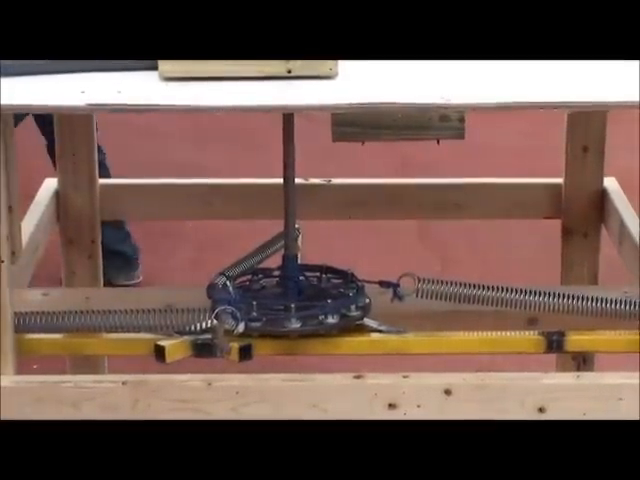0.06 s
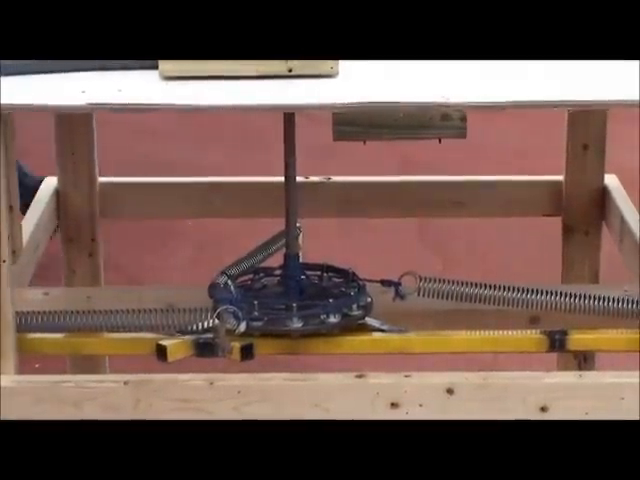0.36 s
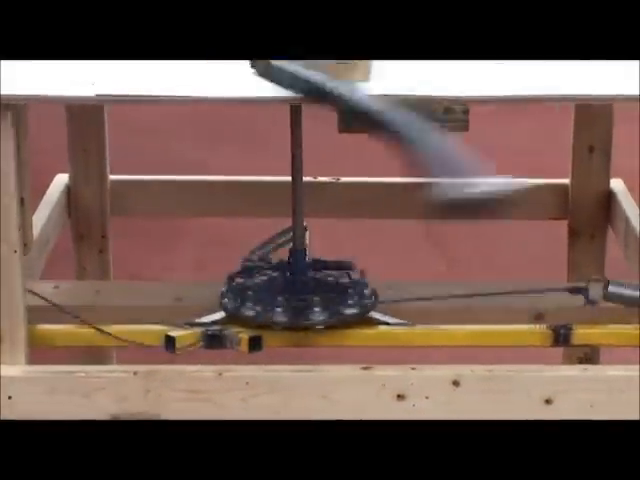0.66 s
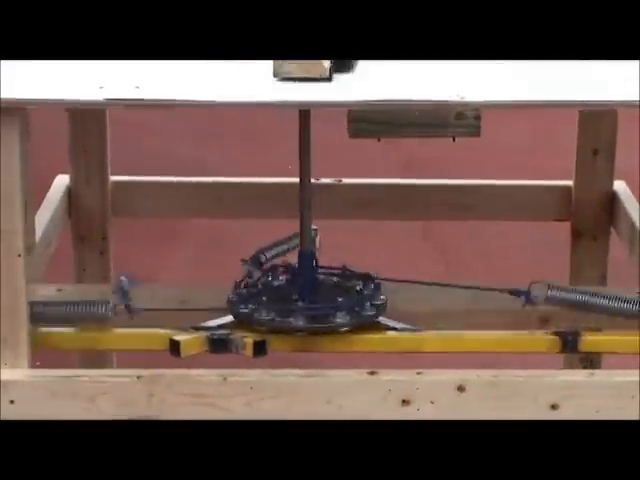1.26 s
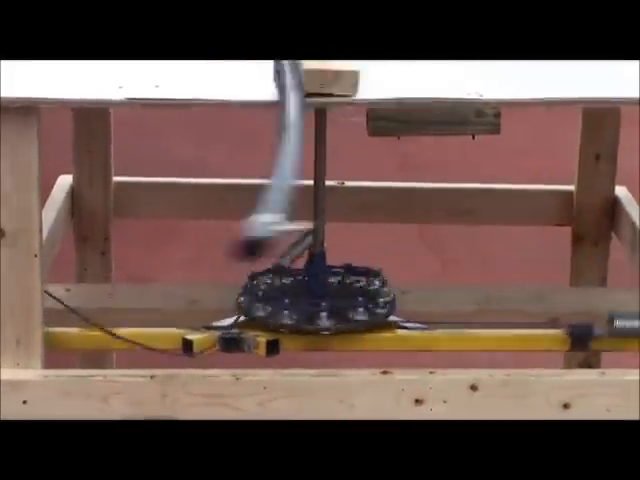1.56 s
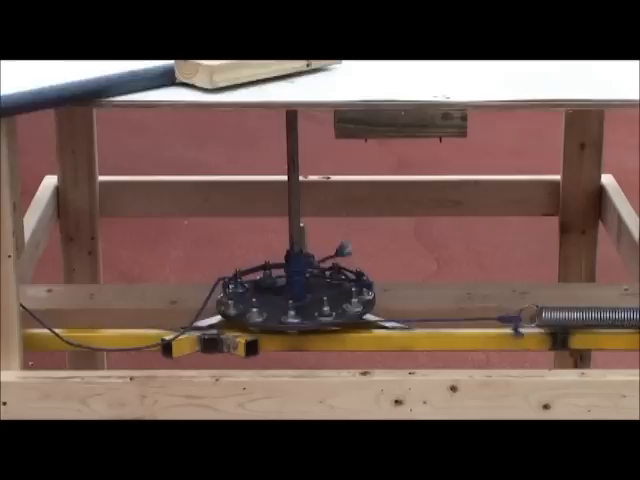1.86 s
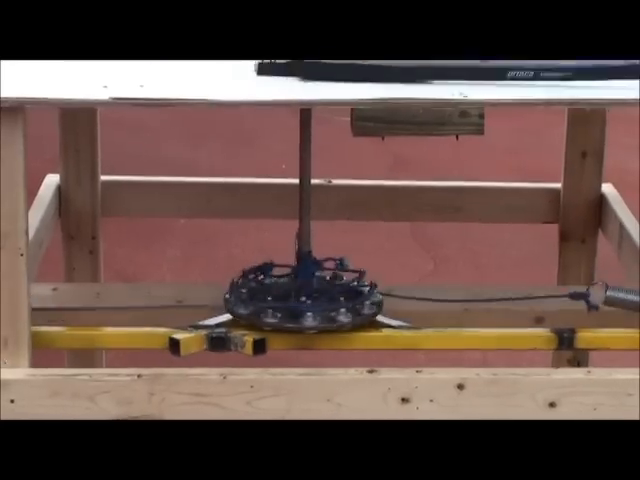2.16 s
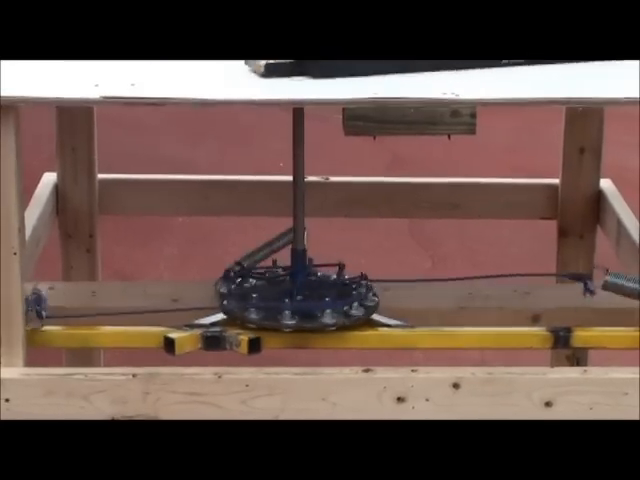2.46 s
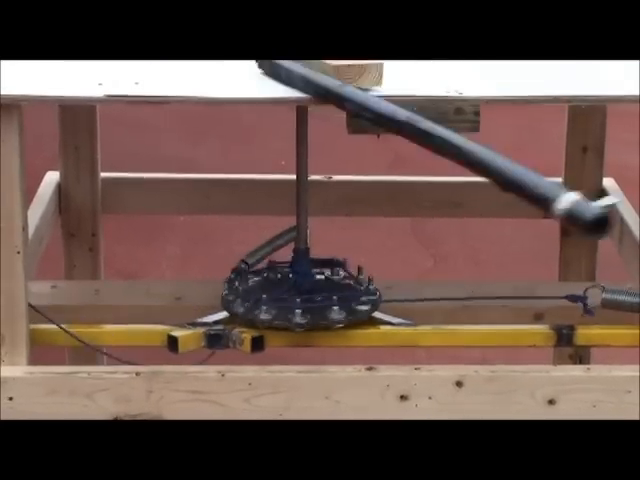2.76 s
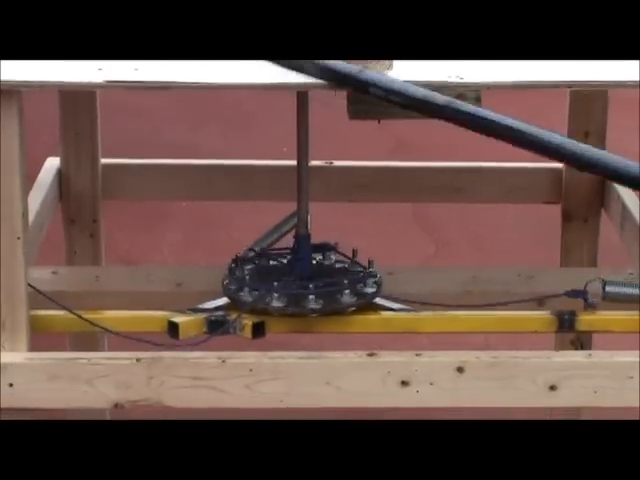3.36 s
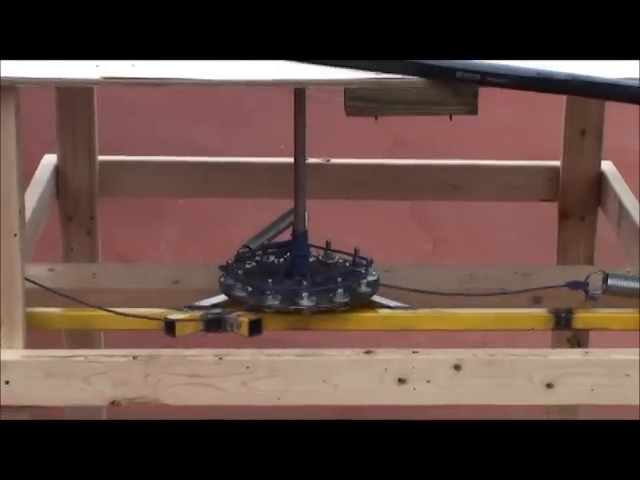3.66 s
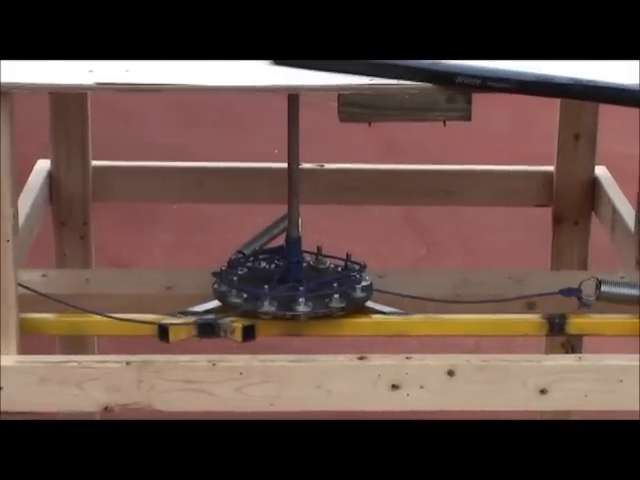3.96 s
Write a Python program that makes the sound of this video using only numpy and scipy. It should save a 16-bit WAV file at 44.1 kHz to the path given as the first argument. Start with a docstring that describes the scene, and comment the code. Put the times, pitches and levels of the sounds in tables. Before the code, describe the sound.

A spring-driven machine clatters in a large, humming hall. Its wooden frame rumbles at first, under faint high chirps. From 0.4 to 1.3 seconds come hard metal clacks and thuds, with steel springs scraping and jingling. Weaker knocks and jingles follow in uneven bursts, and a rod rings briefly near 2.1 seconds. The faint chirps return between 2 and 3 seconds, and the jingling dies away by about 3.4.

```python
"""A low rumble, then hard clacks, scraping and jingling: a spring-driven throwing machine is let go.
Its wooden frame rumbles, its drive snaps, and its long steel springs rub and clash as they go slack.
The arm swings on, bringing weaker knocks and jingles, and a steel rod rings once.
Behind it all are the hum and echo of a large hall and a few runs of faint falling chirps."""
import sys
import numpy as np
from scipy import signal
from scipy.fft import rfft, irfft
from scipy.io import wavfile

SR = 44100
rng = np.random.default_rng(int(sys.argv[2]) if len(sys.argv) > 2 else 0)


def master_out(mix):
    """Clip the mix to full scale and print it as 16-bit PCM to the path in sys.argv[1]."""
    frames = np.transpose(np.atleast_2d(mix))
    ceiling = np.clip(frames, -1, 1)
    pcm = np.round(ceiling * 32767).astype(np.int16)
    wavfile.write(sys.argv[1], SR, pcm)


N = 176400
TIME = np.arange(N) / SR

# spring hooks and coils strike: t/s, treble level/dB, clank level/dB, hook level/dB
SPRING_HITS = [(0.661,-26,-25.5,-44),(0.704,-21.5,-29,-37),(0.758,-23,-33,-36),(0.785,-32,-30.5,-29),(0.936,-40,-26,-30),(0.971,-27.5,-27.5,-36),(1.061,-26,-23.5,-35),(1.079,-22,-39,-31),(1.187,-28,-34,-27),(1.390,-34.5,-38,-37),(1.518,-33,-35.5,-36.5),(1.61,-40.5,-59,-65),(1.668,-28,-27,-40),(1.685,-34,-29.5,-35.5),(1.788,-35,-43,-41.5),(1.933,-38,-45,-45),(1.987,-25.5,-34,-26.5),(2.075,-36,-44,-59),(2.245,-32.5,-37,-38.5),(2.278,-26,-28.5,-32),(2.347,-40,-38.5,-57),(2.411,-31,-34.5,-49),(2.523,-47,-55,-47),(2.592,-36,-51,-40),(2.626,-36.5,-41.5,-66),(2.719,-52,-43.5,-66),(2.798,-46,-47,-47.5),(2.995,-29,-37.5,-38.5),(3.065,-41,-54,-41.5),(3.118,-30.5,-34.5,-37),(3.232,-37,-42.5,-52),(3.394,-49.5,-48,-66)]
# the tones a steel hook rings with: f/Hz, level/dB
HOOK_TONES = [(2345,-3),(2378,-13),(4530,-11.5),(5776,-20),(6025,-18),(6155,-8),(6530,-27),(8274,-2.5),(8428,-4),(8485,-1),(8586,1.5),(8785,-1),(9055,-6),(9335,-10),(9718,-8),(12540,-14)]
# tone colour of the coils' bright jingle: f/Hz, level/dB
COIL_TREBLE = [(2500,-34),(4500,-5),(6200,5),(7400,-0.5),(8700,4),(10500,-3.5),(12300,-1.5),(14200,-13.5),(16000,-19.5)]
# tone colour of the coils' lower clank: f/Hz, level/dB
COIL_CLANK = [(100,-15),(350,5),(560,-2),(800,4.5),(1150,3),(1700,-1),(2400,0.5),(3100,-4),(6500,-6.5),(12000,-33)]

# an attack is the time a sound takes to rise; a T60 is the time it takes to fade by 60 dB
BLOW_ATTACK_S, JINGLE_ATTACK_S, HOOK_T60_S = 0.001457, 0.0024, 0.14


def from_db(db):
    """Turn decibels into a factor to multiply a sound by."""
    return 10 ** (np.asarray(db) / 20)


def rms_one(x):
    """Scale a sound so that its average strength (rms) is 1."""
    return x / np.sqrt(np.mean(x ** 2) + 1e-20)


def level_curves(rows):
    """Join rows of a time and its levels into smooth volume curves."""
    times, *columns = np.transpose(rows)
    return [from_db(np.interp(TIME, times, db)) for db in columns]


def coloured(x, colour):
    """Turn lows and highs up or down, following rows of f/Hz, level/dB."""
    hz, db = np.transpose(colour)
    bin_hz = np.maximum(np.arange(len(x) // 2 + 1) * SR / len(x), 1)
    gain = from_db(np.interp(np.log(bin_hz), np.log(hz), db))
    return irfft(rfft(x) * gain, len(x))


def noise(colour):
    """Steady noise with the given tone colour."""
    return rms_one(coloured(rng.standard_normal(N), colour))


def clicks(times, heights):
    """One click of the given height at each time."""
    samples = np.clip(np.ravel(times) * SR, 0, N - 1).astype(int)
    return np.bincount(samples, np.ravel(heights), N)


def ring(x, hz, t60):
    """Each click in x starts a pure tone that fades away."""
    decay, step = from_db(-60 / (t60 * SR)), 2 * np.pi * hz / SR
    return signal.lfilter([0, np.sin(step)], [1, -2 * decay * np.cos(step), decay * decay], x + 1e-18)


def struck(times, db, colour, attack, t60):
    """A blow wakes so many close tones that they blur into a burst of fading noise."""
    fall, rise = from_db(-120 / (t60 * SR)), np.exp(-1 / (attack * SR))
    blows = clicks(times, from_db(db) ** 2) + 1e-18
    power = signal.lfilter([1 - rise], np.convolve([1, -fall], [1, -rise]), blows)
    return np.sqrt(np.abs(power)) * noise(colour)


def reflections(samples, t60):
    """A dense, fading crowd of echoes of one click."""
    echoes = rng.standard_normal(samples) * from_db(-60 * TIME[:samples] / t60)
    return echoes / np.sqrt(np.sum(echoes ** 2))


def through(x, response):
    """Every sample of x sets off its own copy of the response."""
    return signal.fftconvolve(x, response)[:N]


def hum_and_rumble():
    """The hall hums steadily; the frame rumbles as it is let go, then settles."""
    # loudness of the frame's rumble: t/s, level/dB
    rumble_levels = [(0,-27),(.21,-25.5),(.41,-27),(.5,-32),(.75,-44),(1.25,-48.5),(1.6,-50),(2.2,-53)]
    # tone colour of the rumble: f/Hz, level/dB
    rumble_colour = [(13,-38),(22,-3),(107,3),(579,-22.5),(753,-17.5),(930,-26.5),(6370,-36.5),(16000,-82)]
    # tone colour of the hall's hum: f/Hz, level/dB
    hum_colour = [(13,-47),(22,-14.5),(147,-4),(280,-19),(366,-7.5),(409,-20),(771,-21),(3710,-31),(16000,-54)]
    rumble_gain, = level_curves(rumble_levels)
    return rumble_gain * noise(rumble_colour) + from_db(-50) * noise(hum_colour)


def chirps():
    """Faint, high chirps come evenly spaced, each sliding down in pitch."""
    # runs of chirps: start/s, end/s, level/dB
    runs = [(0.077,.55,-40),(2.117,2.22,-42),(2.67,2.9,-48.5)]
    gap_s, length_s, start_hz, end_hz = .0412, .013, 7650, 5750
    t = TIME[TIME < length_s]
    hz = np.interp(t, [0, length_s], [start_hz, end_hz])
    chirp = np.sin(np.pi * t / length_s) ** 2 * np.sin(2 * np.pi * np.cumsum(hz) / SR)
    times, levels = np.transpose([(at, db) for start, end, db in runs for at in np.arange(start, end, gap_s)])
    return through(clicks(times, from_db(levels)), chirp)


def hall_echo(x):
    """Sound bounces back as one dull echo from the floor and a long faint tail from the hall."""
    # tone colour of the tail: f/Hz, level/dB
    tail_colour = [(100,7.5),(400,7.5),(8000,-40),(16000,3)]
    floor_delay_s, tail_delay_s = .0155, .012
    muffle = signal.butter(1, 3000, fs=SR, output="sos")
    floor = signal.sosfilt(muffle, np.interp(TIME - floor_delay_s, TIME, x))
    tail = coloured(through(x, reflections(samples=50000, t60=0.57)), tail_colour)
    return from_db(-13) * floor + from_db(-16) * np.interp(TIME - tail_delay_s, TIME, tail)


def side_echoes(x):
    """Echoes from the sides smear a sound in time but keep its tone colour."""
    response = rfft(reflections(samples=1500, t60=.03), N)
    return irfft(rfft(x) * response / np.abs(response), N)


def rod():
    """A steel rod is knocked once and rings on with a clear tone."""
    # the rod's tones: f/Hz, level/dB
    tones = [(668,-34.5),(2005,-48)]
    return sum(ring(clicks(times=[2.115], heights=from_db([db])), hz, t60=.36) for hz, db in tones)


def wheel_knocks():
    """Each knock is a short clatter that also rings the wheel's tones nearest its own pitch."""
    # knocks of the wheel and its linkage: t/s, level/dB, centre f/Hz
    knocks = [(1.023,-25,2160),(1.205,-20,2100),(1.3134,-18.5,1070),(1.328,-29,1000),(1.433,-24,1170),(1.6641,-19,1720),(1.801,-27,2130),(2.114,-31,2230),(2.136,-28,298),(2.152,-32.5,760),(2.466,-36.5,1660),(2.9608,-29,2250)]
    # the wheel's tones: f/Hz, level/dB
    tones = [(280,-3),(730,-4.5),(1055,3),(1320,-2),(1735,-3.5),(2100,-2),(2580,0),(3490,-6)]
    times, db, pitch = np.transpose(knocks)
    width_octaves, colour_hz = .7, np.geomspace(100, 16000, 24)
    out = 0
    for at, level, centre in knocks:
        colour_db = np.maximum(-4 * (np.log2(colour_hz / centre) / width_octaves) ** 2, -40)
        out += struck([at], level - 6, np.c_[colour_hz, colour_db], BLOW_ATTACK_S, t60=.052)
    for k, (hz, tone_db) in enumerate(tones):
        nearness = np.exp(-(np.log2(hz / pitch) / width_octaves) ** 2 / 2)
        starts = times + rng.uniform(0, 2 * BLOW_ATTACK_S, len(times))
        heights = nearness * from_db(db + tone_db + 1 + rng.normal(0, 1, len(times)))
        out += (-1) ** k * ring(clicks(starts, heights), hz, t60=0.033)
    return out


def grit(colour):
    """Rubbing steel makes a hail of tiny contacts, uneven in strength."""
    contacts_per_s, spread_db, flutter_db = 800, 2, 4.4
    contacts = np.flatnonzero(rng.random(N) < contacts_per_s / SR)
    db = spread_db * np.minimum(rng.exponential(1, N), 4)
    flutter_times = TIME[::SR // 60]  # the level wanders 60 times a second
    db += flutter_db * np.interp(TIME, flutter_times, rng.standard_normal(len(flutter_times)))
    return rms_one(struck(contacts / SR, db[contacts], colour, attack=.0003, t60=0.024))


def clinks(low_hz, high_hz, colour):
    """Single coils touch at random, each ringing briefly at its own pitch."""
    coils, touches_per_s = 60, 15
    out = 0
    for hz in np.geomspace(low_hz, high_hz, coils) * rng.uniform(.98, 1.02, coils):
        times = rng.uniform(0, N / SR, int(touches_per_s * N / SR))
        out += np.sqrt(hz) * ring(clicks(times, rng.standard_normal(len(times))), hz, t60=.11)
    return rms_one(coloured(out, colour))


def spring_scrape():
    """Coils drag over the steel rail: grit and small clinks, while the hook keeps ringing."""
    # loudness of the dragging springs: t/s, treble level/dB, clank level/dB
    drag_levels = [(.41,-48.5,-63),(.525,-44,-45.5),(.545,-30.5,-33.5),(.61,-44.5,-39.5),(.648,-40,-50),(.675,-24,-34),(.745,-30,-42.5),(.80,-22.5,-41.5),(.86,-23,-29.5),(.92,-20,-33),(.99,-29,-37),(1.085,-31,-38.5),(1.13,-33,-40.5),(1.245,-30.5,-36),(1.28,-37.5,-38.5),(1.42,-37,-42),(1.525,-25,-37.5),(1.56,-46,-60),(1.65,-38.5,-42),(1.71,-31,-45),(1.765,-40,-43.5),(1.92,-43.5,-51.5),(2.03,-37.5,-46),(2.225,-51.5,-54.5),(2.31,-44,-48.5),(2.39,-47,-52),(2.51,-53,-49),(2.56,-35,-44.5),(2.70,-55,-53.5),(2.96,-55.5,-74),(3.02,-32,-43.5),(3.055,-46,-51.5),(3.28,-44,-52),(3.37,-61,-61),(3.6,-61,-66)]
    treble_gain, clank_gain = level_curves(drag_levels)
    rubbing = rng.standard_normal(N)
    hook = rms_one(sum(from_db(db) * ring(rubbing, hz, HOOK_T60_S) for hz, db in HOOK_TONES))
    clink_share = .36
    grit_gain, clink_gain = np.sqrt(1 - clink_share), np.sqrt(clink_share)
    treble = grit_gain * grit(COIL_TREBLE) + clink_gain * clinks(4200, 13000, COIL_TREBLE)
    clank = grit_gain * grit(COIL_CLANK) + clink_gain * clinks(330, 5000, COIL_CLANK)
    return from_db(-6.5) * treble_gain * (treble + from_db(-7) * hook) + from_db(2) * clank_gain * clank


def coil_rings():
    """Every strike wakes another handful of the coils' high tones."""
    tone_count, t60 = 22, 0.2
    out, t = np.zeros(N + SR), TIME[:SR // 3]
    for at, db, _, _ in SPRING_HITS:
        hz = rng.uniform(4500, 12000, (tone_count, 1))
        tones = rng.standard_normal((tone_count, 1)) * np.sin(2 * np.pi * hz * t)
        rise_and_fade = (1 - np.exp(-t / JINGLE_ATTACK_S)) * from_db(db - 19 - 60 * t / t60)
        out[int(at * SR):][:len(t)] += rise_and_fade * tones.sum(axis=0)
    return coloured(out[:N], COIL_TREBLE)


def spring_jingles():
    """The coils crash together and the hook rings, with a new mix of its tones each time."""
    times, treble_db, clank_db, hook_db = np.transpose(SPRING_HITS)
    out = struck(times, treble_db, COIL_TREBLE, JINGLE_ATTACK_S, t60=0.067)
    out += struck(times, clank_db, COIL_CLANK, JINGLE_ATTACK_S, t60=0.1)
    for hz, tone_db in HOOK_TONES:
        db = hook_db + tone_db + rng.normal(0, 3.5, len(times))
        starts = times + rng.uniform(0, 2 * JINGLE_ATTACK_S, len(times))
        out += ring(clicks(starts, from_db(db)), hz, HOOK_T60_S)
    return out


def drive_clacks():
    """The drive snaps: a bright crack, a short metal clack and a thud that rings the wooden frame."""
    # blows of the drive: t/s, metal level/dB, thud level/dB, crack level/dB
    blows = [(0.4172,-22,-29,-24.5),(0.4484,-25.5,-38,-32),(0.4758,-26,-32,-33),(0.551,-27,-39,-18.5),(.587,-26,-25,-20),(0.594,-29,-23.5,-33),(0.631,-22.5,-33,-24),(0.636,-37,-17.5,-45),(.656,-22.5,-28,-34),(.852,-38,-25,-34),(.866,-33,-28.5,-37),(0.919,-22.5,-30.5,-33),(1.161,-22.5,-21.5,-24.5),(1.164,-23,-25.5,-29),(1.174,-44,-24.5,-25),(1.251,-24,-20.5,-29),(1.261,-46,-36,-50),(2.279,-29.5,-43,-25),(2.290,-42,-32,-25)]
    # the wooden frame's tones: f/Hz, level/dB
    frame_tones = [(145,0),(210,0.5),(440,-2)]
    # tone colour of the thud: f/Hz, level/dB
    thud_colour = [(40,-18),(220,-0.5),(450,-4),(1000,-13),(2500,-49)]
    # tone colour of the metal: f/Hz, level/dB
    metal_colour = [(250,-55),(600,-3),(1200,5),(2500,2),(4000,-2.5),(6000,-5),(12000,-41)]
    # tone colour of the crack: f/Hz, level/dB
    crack_colour = [(1500,-39),(4000,5),(9000,2.5),(12500,3),(16000,-24)]
    times, metal_db, thud_db, crack_db = np.transpose(blows)
    thud_attack_s = 0.0027
    wood = from_db(-1.5) * struck(times, thud_db, thud_colour, thud_attack_s, t60=0.089)
    for k, (hz, tone_db) in enumerate(frame_tones):
        starts = times + rng.uniform(0, thud_attack_s, len(times))
        heights = from_db(thud_db + tone_db - 3 + rng.normal(0, 1, len(times)))
        wood += (-1) ** k * ring(clicks(starts, heights), hz, t60=0.053)  # every other tone is flipped
    metal = struck(times, metal_db, metal_colour, BLOW_ATTACK_S, t60=0.056)
    crack = struck(times, crack_db, crack_colour, attack=0.00046, t60=0.026)
    return from_db(1.5) * (metal + wood + crack)


def scene():
    """The machine stands straight ahead in the hall; only the low sounds spread wide."""
    # strength of the sides compared with the centre: f/Hz, level/dB
    width = [(25,-13),(140,-6),(500,-13),(2200,-23),(6200,-17),(9500,-17),(11500,-28)]
    machine = drive_clacks() + wheel_knocks() + rod() + spring_jingles() + coil_rings() + spring_scrape()
    sound = machine + hall_echo(machine) + chirps()
    centre = sound + hum_and_rumble()
    side = coloured(side_echoes(sound) + hum_and_rumble(), width)
    return np.array([centre + side, centre - side])


def record(dry):
    """The very highest treble is cut away."""
    cutoff_hz = 16200
    return signal.sosfilt(signal.ellip(10, .1, 80, cutoff_hz, fs=SR, output="sos"), dry)


dry = scene()
out = record(dry)
master_out(out)
```